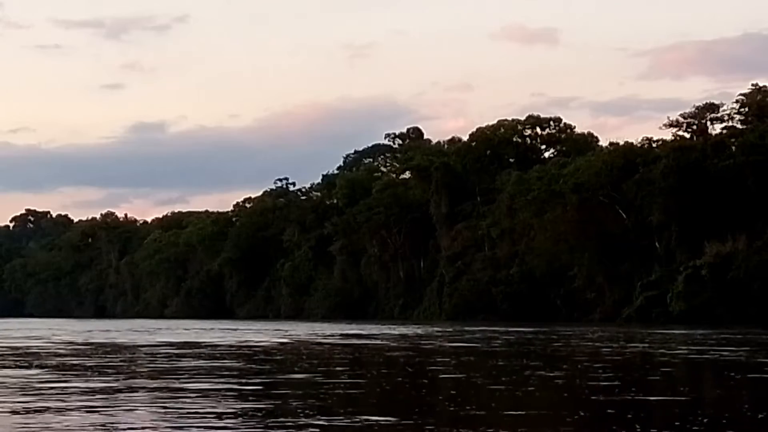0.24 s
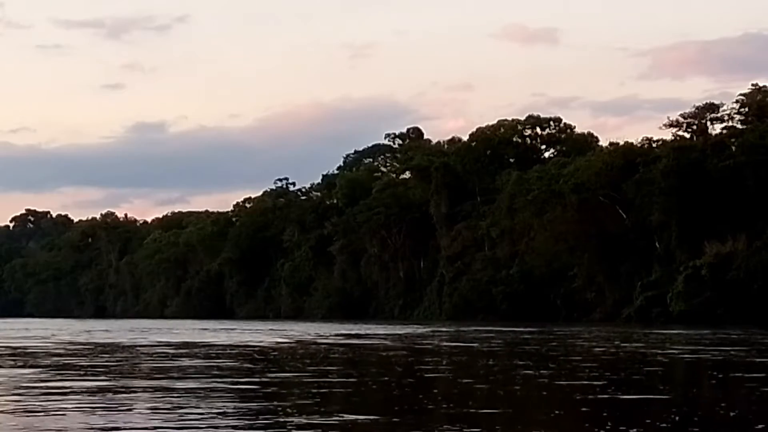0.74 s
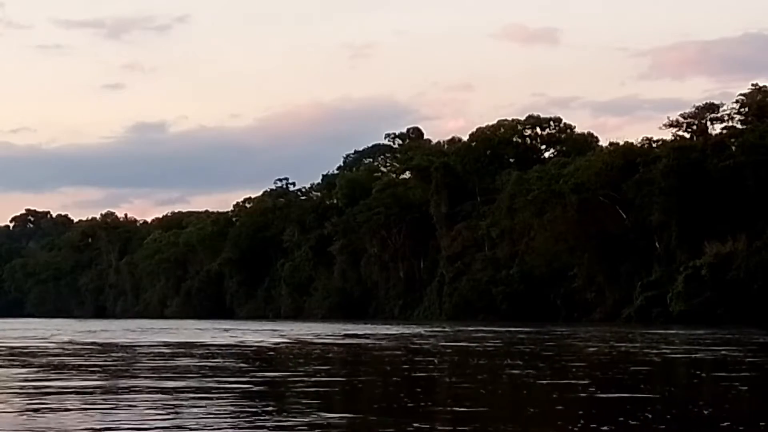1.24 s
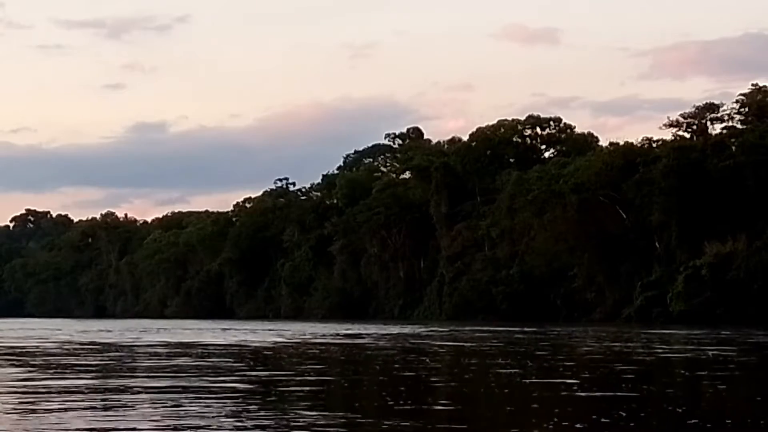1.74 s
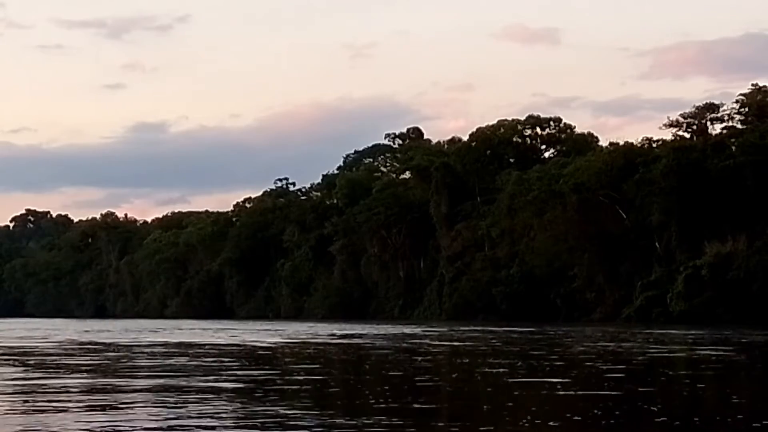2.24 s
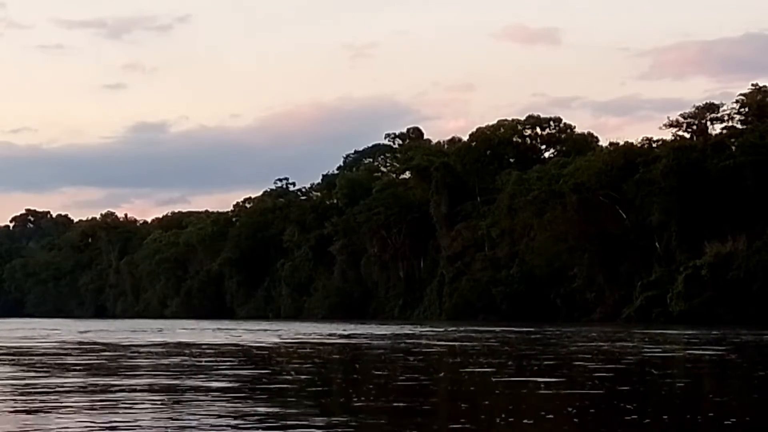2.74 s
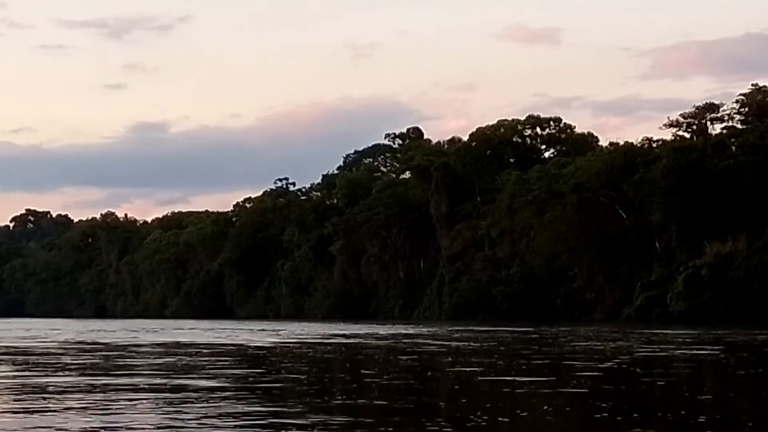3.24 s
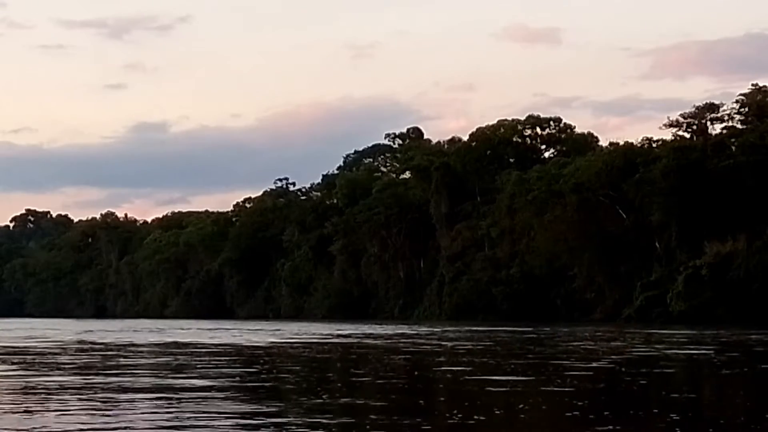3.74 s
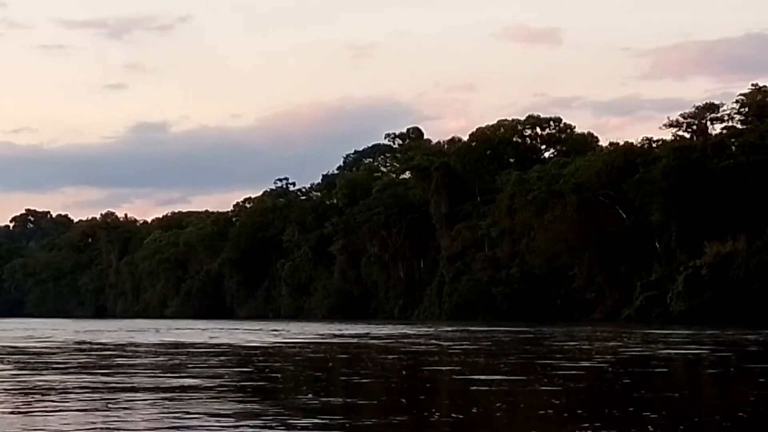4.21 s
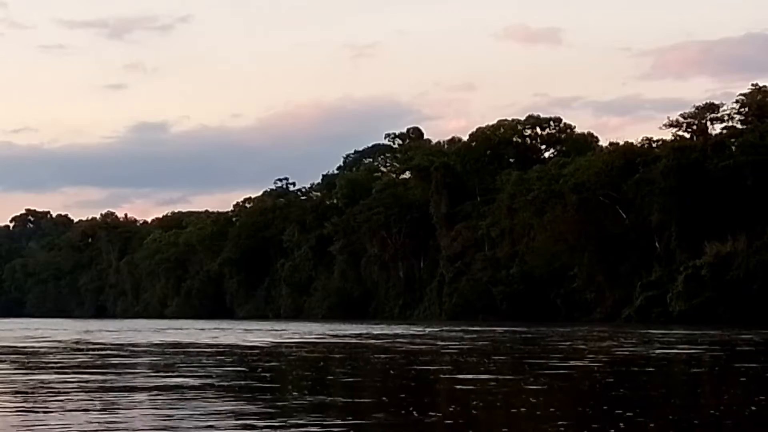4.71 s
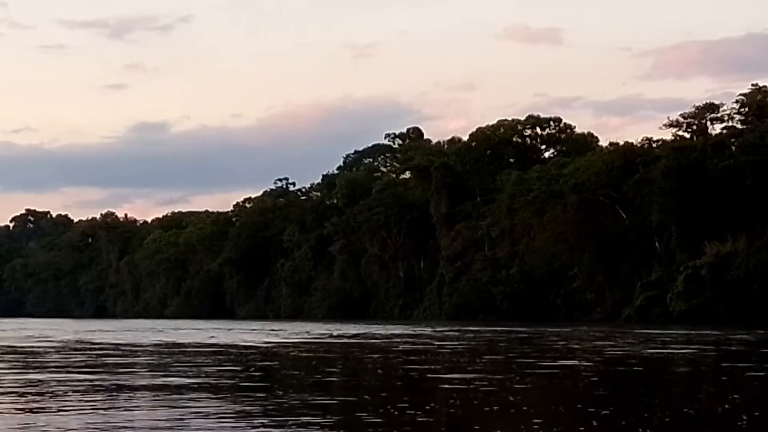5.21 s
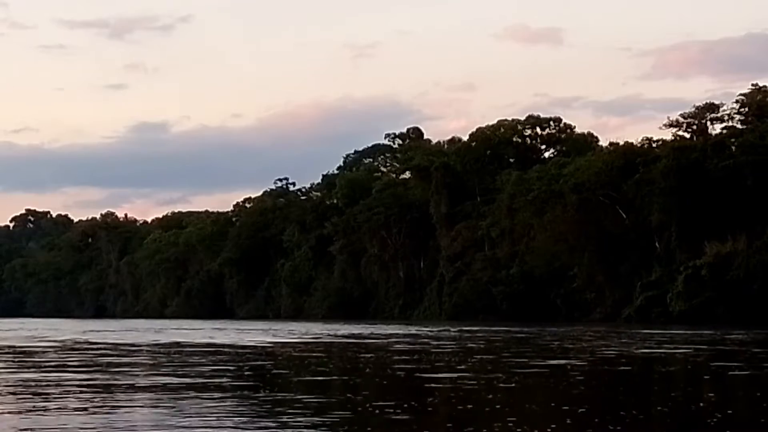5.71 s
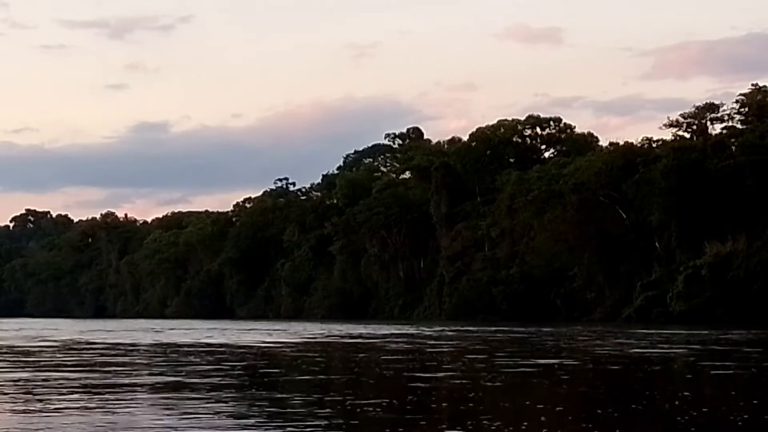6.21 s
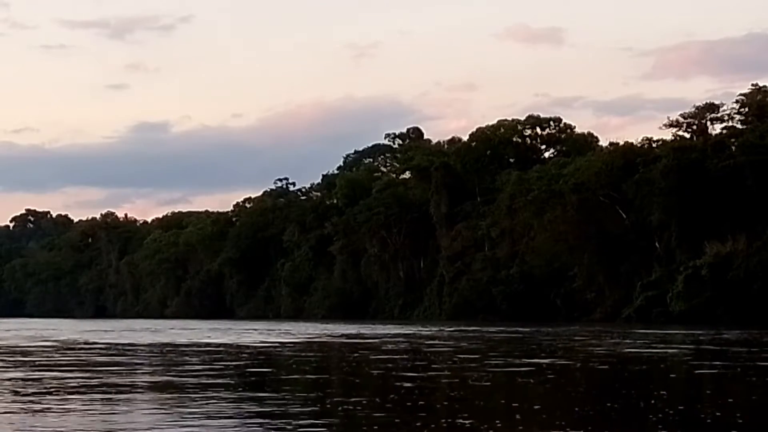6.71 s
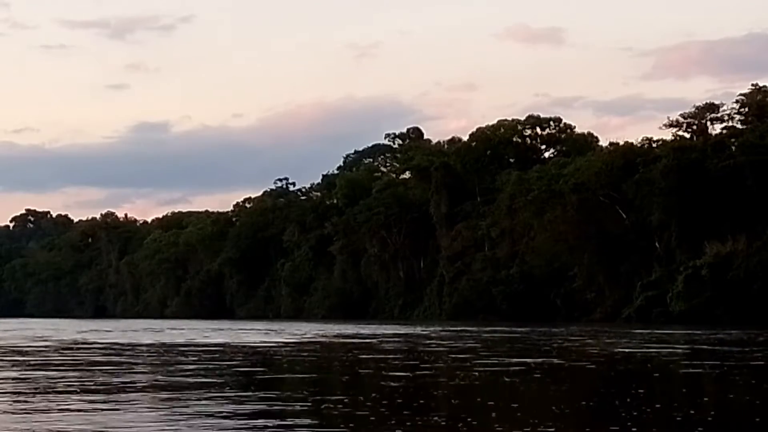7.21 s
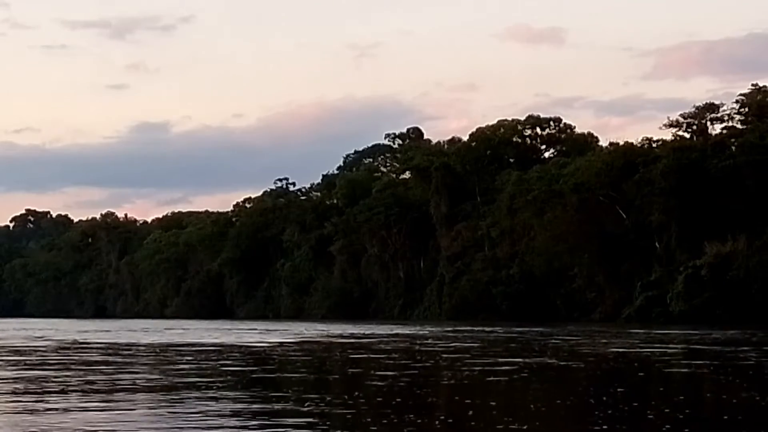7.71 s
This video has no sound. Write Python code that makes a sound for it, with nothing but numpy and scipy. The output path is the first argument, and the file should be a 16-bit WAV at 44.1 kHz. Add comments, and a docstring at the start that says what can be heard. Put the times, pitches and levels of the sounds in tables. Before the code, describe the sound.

A high, shrill cicada chorus throbs in the treetops throughout, heard from a forest river at dusk. It swells unevenly two or three times a second over a soft, high wash of distant insects. Thin insect whistles come and go between 0.5 and 2 seconds. From about 3 seconds one nearer cicada swells into a long buzz, peaking at 4.2 seconds and stopping quickly. Two more brief whistles follow around 4.5 and 5 seconds as the chorus turns shriller. From 4.7 seconds to the end at 8, the near cicada sings eight even buzzing pulses, about two and a half a second, standing a little above the chorus with a short scatter off the trees. Far below the insects are a very faint, steady river murmur and hum, with barely audible pairs of distant hoots around 3.5 and 6.8 seconds.

```python
"""A cicada chorus throbs in the treetops, heard from a forest river at dusk.
One near male swells into a long buzz, then sings in pulses, 2.5 a second.
Each cicada buckles the ribs of a tymbal; the clicks ring his body and scatter off the trunks.
Thin insect whistles come and go. Far below them: the river's murmur, a faint hum, distant hoots."""
import sys
import numpy as np
from scipy import signal
from scipy.fft import rfft, irfft
from scipy.io import wavfile
from scipy.ndimage import uniform_filter1d, map_coordinates

SR = 44100
rng = np.random.default_rng(int(sys.argv[2]) if len(sys.argv) > 2 else 0)


def master_out(mix):
    """Clip the mix to full scale and print it as 16-bit PCM to the path in sys.argv[1]."""
    frames = np.transpose(np.atleast_2d(mix))
    ceiling = np.clip(frames, -1, 1)
    pcm = np.round(ceiling * 32767).astype(np.int16)
    wavfile.write(sys.argv[1], SR, pcm)


N = 350595
T = np.arange(N) / SR


def from_db(db):
    """dB to gain."""
    return 10 ** (np.asarray(db) / 20)


def rms_one(x):
    """Scale to rms 1."""
    return x / np.sqrt(np.mean(x ** 2) + 1e-20)


def in_time(rows):
    """Breakpoint columns, interpolated per sample."""
    times_s, *columns = np.transpose(rows)
    return [np.interp(T, times_s, column) for column in columns]


def drift(knots_per_s):
    """Piecewise-linear random wander; rms 1."""
    knots = rng.standard_normal(4096)
    return rms_one(map_coordinates(knots, [T * knots_per_s + 5], order=1, mode="wrap"))


def coloured_noise(spectrum):
    """Noise of a given spectral shape; rms 1."""
    hz, db = np.transpose(spectrum)
    bins_hz = np.maximum(np.arange(N // 2 + 1) * SR / N, 1)
    gain = from_db(np.interp(np.log(bins_hz), np.log(hz), db, left=-80, right=-80))
    return rms_one(irfft(rfft(rng.standard_normal(N)) * gain, N))


def tone(hz, rms_db):
    """Sine along a pitch curve."""
    return np.sqrt(2) * from_db(rms_db) * np.sin(2 * np.pi * np.cumsum(hz) / SR)


def wavering_notes(notes, fade_s, waver_hz, waver_db):
    """Gated sines, unsteady in pitch and level."""
    out = np.zeros(N)
    for start, end, hz, db in notes:
        gate = np.clip(np.minimum(T - start, end - T) / fade_s, 0, 1)
        out += gate * tone(hz + waver_hz * drift(120), db + waver_db * drift(25))
    return out


# Far hum partials: f/Hz, level/dB
HUM_PARTIALS = [(175, -94), (348, -95), (608, -102)]
# Water spectrum: f/Hz, relative density/dB
WATER_SPECTRUM = [(20, 2), (40, 2), (65, 2.5), (110, -1.5), (170, -8.5), (210, -6.5), (330, -7), (480, -9),
                  (720, -12), (1000, -15), (1400, -16.5), (2500, -21.5)]
# Thin far tone: t/s, f/Hz, level/dB
THIN_TONE = [(3.2, 1200, -115), (3.4, 1180, -90.5), (3.9, 1156, -98.5), (5.3, 1191, -89), (6.4, 1185, -95),
             (7.9, 1180, -94)]

def river():
    """Smoothly flowing water, with a faint hum and a thin tone from afar."""
    hum = sum(tone(hz + 3 * drift(12), db + 3 * drift(4.0)) for hz, db in HUM_PARTIALS)
    water = from_db(-77.5) * coloured_noise(WATER_SPECTRUM)
    thin_hz, thin_db = in_time(THIN_TONE)
    return water + hum + tone(thin_hz + 2.6 * drift(15), thin_db)


# Hoots: start t/s, end t/s, f/Hz, level/dB
HOOT_NOTES = [(3.27, 3.47, 775, -86), (3.58, 3.85, 722, -90), (6.56, 6.75, 687, -92),
              (6.84, 7.0, 678, -86.5)]

def far_hoots():
    """Two faint pairs of low, wavering notes."""
    return wavering_notes(HOOT_NOTES, fade_s=0.055, waver_hz=34.9, waver_db=4.0)


# Far forest spectrum: f/Hz, relative density/dB
FOREST_SPECTRUM = [(1200, -38.5), (1520, -25.5), (1950, -20.5), (2420, -9), (2750, -12), (3500, -5),
                   (3930, -0.5), (4110, -1.5), (4330, 3), (4600, 0), (4850, 2), (6000, 1), (6700, -1),
                   (7300, -20.5)]
# Its slow fade: t/s, base level/dB
FOREST_FADE = [(0, -51.5), (2.6, -52), (4.3, -53), (7.9, -54)]

def far_forest(throb_db):
    """High wash of noise that partly follows the chorus."""
    return from_db(in_time(FOREST_FADE)[0] + .3 * throb_db) * coloured_noise(FOREST_SPECTRUM)


# Whistles: start t/s, end t/s, f/Hz, level/dB
WHISTLE_NOTES = [(.5, 1.05, 5228, -57.5), (1.28, 1.57, 5532, -55.5), (1.58, 1.92, 5532, -57),
                 (1.9, 2.1, 5972, -56.5), (4.42, 4.62, 5972, -55), (4.92, 5.1, 5974, -55)]

def insect_whistles():
    """Thin, nearly pure notes."""
    return wavering_notes(WHISTLE_NOTES, fade_s=0.044, waver_hz=14, waver_db=1.0)


def tymbal(clicks_per_s, wander, jitter_s, uneven_db):
    """Ribs buckle in turn: a click train, uneven in time and strength."""
    ribs = np.cumsum(clicks_per_s * (1 + wander * drift(30))) / SR
    onsets = np.flatnonzero(np.diff(np.floor(ribs)))
    timing, strength = rng.standard_normal((8192, 2))[:len(onsets)].T
    onsets = (onsets + np.round(timing * jitter_s * SR).astype(int)) % N
    return np.bincount(onsets, from_db(uneven_db * strength), N)


def body_mode(clicks, hz, width_hz):
    """Resonator applied twice for steep skirts; peak gain 1."""
    r = np.exp(-np.pi * width_hz * np.sqrt(2) / SR)
    b = np.array([1, 0, -1]) * (1 - r * r) / 2
    a = [1, -2 * r * np.cos(2 * np.pi * hz / SR), r * r]
    return signal.lfilter(b, a, signal.lfilter(b, a, clicks + 1e-18))


def gliding_mode(clicks, hz, width_hz):
    """Steep resonator along a pitch curve; peak gain 1."""
    carrier = np.exp(2j * np.pi * np.cumsum(hz) / SR)
    r = np.exp(-np.pi * width_hz * np.sqrt(2) / SR)
    baseband = signal.lfilter([(1 - r) ** 2], [1, -2 * r, r * r], clicks / carrier + 1e-18)
    return 2 * np.real(carrier * baseband)


def steadied(x):
    """A singer holds his power: swings slower than about 10 ms even out."""
    power = np.abs(uniform_filter1d(x ** 2, size=500))
    return x * np.std(x) / np.sqrt(power + 1e-14)


def among_trees(x, build_s, t60_s, wet_db, leaves_hz):
    """Direct sound plus decaying scatter from trunks; leaves absorb its treble."""
    t = T[:SR // 2]
    scatter = rng.standard_normal(len(t)) * from_db(-60 * t / t60_s) * np.minimum(t / build_s, 1) ** 2
    leaves = signal.butter(4, leaves_hz, fs=SR, output="sos")
    scatter = signal.sosfilt(leaves, scatter / np.linalg.norm(scatter))
    return x + from_db(wet_db) * signal.fftconvolve(x, scatter)[:N]


def singers(body, clicks_per_s, size_spread, flutter_db, count):
    """Several males, each with his own click rate, body size and wavering timbre; rms 1."""
    group = np.zeros(N)
    for offset in np.linspace(-1, 1, count):
        clicks = tymbal(clicks_per_s * np.exp(.2 * offset), wander=.04, jitter_s=.00008, uneven_db=5.5)
        for hz, width_hz, db in body:
            mode = body_mode(clicks, hz * (1 + size_spread * offset), width_hz)
            group += from_db(db + flutter_db * drift(16)) * mode
    return rms_one(among_trees(steadied(group), build_s=0.013, t60_s=0.12, wet_db=-1.5, leaves_hz=7700))


# Chorus swells: centre t/s, half-power width/s, level/dB
CHORUS_SWELLS = [(0.055, 0.18, -44), (0.405, .17, -43.5), (0.778, .13, -42.5), (1.185, 0.24, -47),
                 (1.372, 0.059, -46.5), (1.672, 0.24, -47), (2.051, 0.19, -48.5), (2.375, 0.11, -44),
                 (2.743, 0.13, -44.5), (3.113, 0.19, -48), (3.492, .2, -51), (3.87, 0.42, -48.5),
                 (4.252, .2, -49.5), (4.463, .07, -48), (4.6, 0.1, -46.5), (4.992, 0.22, -49.5),
                 (5.43, 0.29, -47.5), (5.873, .2, -45.5), (6.271, .24, -47), (6.702, .17, -45.5),
                 (7.1, .21, -46.5), (7.426, .13, -46.5), (7.839, 0.14, -46.5)]

def throb(lull_db=-58, squareness=1.91):
    """Chorus level in dB: bell-shaped swells over a steady lull."""
    power = from_db(lull_db) ** 2
    for centre, width_s, db in CHORUS_SWELLS:
        halvings = np.abs(2 * (T - centre) / width_s) ** squareness
        power = power + from_db(db) ** 2 * .5 ** np.minimum(halvings, 20)
    return 10 * np.log10(power)


# Main group's body modes: f/Hz, width/Hz, relative level/dB
MAIN_MODES = [(5240, 160, -9.5), (5563, 230, -5), (5703, 170, 3), (5988, 150, 6.5), (6350, 184, 2.5),
              (6460, 200, -6.5)]
# Shrill group's body modes: f/Hz, width/Hz, relative level/dB
SHRILL_MODES = [(3250, 97, -15.5), (3674, 170, -13), (6040, 210, -4.5), (6430, 160, 0.5), (6647, 130, 3),
                (6892, 300, -2)]
# Shrill group's entry: t/s, base level/dB
SHRILL_ENTRY = [(0, -63.5), (3.2, -59.5), (4.8, -49.5), (7.9, -49)]

def chorus():
    """Treetop males throb together; a shriller group and the far forest partly follow."""
    main_db = throb()
    throb_db = main_db - main_db.mean()
    shrill_db = in_time(SHRILL_ENTRY)[0] + .5 * throb_db
    main = singers(MAIN_MODES, clicks_per_s=545, size_spread=.005, flutter_db=5.5, count=4)
    shrill = singers(SHRILL_MODES, clicks_per_s=585, size_spread=0.0022, flutter_db=4.5, count=3)
    return from_db(main_db) * main + from_db(shrill_db) * shrill + far_forest(throb_db)


BUZZ_PEAK_S, BUZZ_PEAK_DB = 4.215, -39

def long_buzz(rise_db_per_s=14.5, fall_db_per_s=231):
    """Near male's level and click rate: long crescendo, quick stop; the tymbal slows just before."""
    to_peak_s = BUZZ_PEAK_S - T
    db = BUZZ_PEAK_DB - np.maximum(rise_db_per_s * to_peak_s, -fall_db_per_s * to_peak_s)
    clicks_per_s = np.where(to_peak_s > .12, 550, 362)
    return db, clicks_per_s


# Near male's pulses: centre t/s, length/s, level/dB
NEAR_PULSES = [(4.798, .175, -40.5), (5.195, .18, -40), (5.583, .175, -41), (5.974, .18, -42),
               (6.362, .17, -40), (6.767, .175, -41), (7.186, 0.16, -41), (7.6, .16, -40.5)]

def abdomen_pulses(lag_s=.008):
    """Per pulse: flat-topped effort while the abdomen opens (1) and shuts (0)."""
    effort, opening = np.zeros(N), np.zeros(N)
    for centre, length, db in NEAR_PULSES:
        effort += from_db(db) / (1 + ((T - centre) / (length / 2)) ** 24)
        opening += np.maximum(1 - ((T - centre - lag_s) / (.6 * length)) ** 2, 0)
    return effort, opening


# Near male's body modes: f/Hz, width/Hz, relative level/dB
NEAR_MODES = [(3240, 80, -23), (3528, 84, -14), (3623, 110, -19), (3820, 150, -13.5), (4355, 65, -3),
              (4405, 84, 0), (4880, 89, 0), (5216, 160, -3), (5570, 60, -8.5), (5700, 83, 2), (6312, 96, 4),
              (6350, 80, -10), (6726, 170, -7)]

def near_male(shut_hz=6800, open_hz=3800, edge_hz=230, hurry=.09, shut_sharpening=.015, mellow=0.23):
    """Buzz, then pulses: high modes speak first and last, low ones only with the abdomen open."""
    buzz_db, clicks_per_s = long_buzz()
    effort, opening = abdomen_pulses()
    lowest_hz = shut_hz + (open_hz - shut_hz) * opening
    # Opening quickens the clicks and lowers the modes to the buzz pitch.
    clicks = tymbal(clicks_per_s * (1 + hurry * opening), wander=.01, jitter_s=.00005, uneven_db=4.0)
    pitch = 1 + shut_sharpening * (1 - opening) * (T > BUZZ_PEAK_S) + .0045 * drift(70)
    modes = [from_db(db) * steadied(gliding_mode(clicks, hz * pitch, width_hz))
             for hz, width_hz, db in NEAR_MODES]
    song = np.zeros(N)
    for mode, (hz, _, _) in zip(modes, NEAR_MODES):
        entry_hz = max(hz, 4300)   # the weak low modes enter together
        speaks = .5 + .5 * np.tanh((entry_hz - lowest_hz) / edge_hz)
        # A soft buzz leans on the low modes.
        tilt_db = mellow * (buzz_db - buzz_db.max()) * np.log2(entry_hz / 5500)
        song += mode * (from_db(buzz_db + tilt_db) + effort * speaks)
    return among_trees(song / np.std(sum(modes)), build_s=0.03, t60_s=0.3, wet_db=-4.0, leaves_hz=4940)


def scene():
    """All sources, alike in both ears."""
    mix = chorus() + near_male() + insect_whistles() + far_hoots() + river()
    return np.array([mix, mix])


def record(dry, rolloff_hz=7150, stop_hz=7950, hiss_db=-99):
    """Treble roll-off, then a steep cut, over faint hiss."""
    rolled = signal.sosfilt(signal.butter(24, rolloff_hz, fs=SR, output="sos"), dry)
    cut = signal.sosfilt(signal.cheby2(20, 60, stop_hz, fs=SR, output="sos"), rolled)
    return cut + from_db(hiss_db) * rng.standard_normal(N)


dry = scene()
out = record(dry)
master_out(out)
```